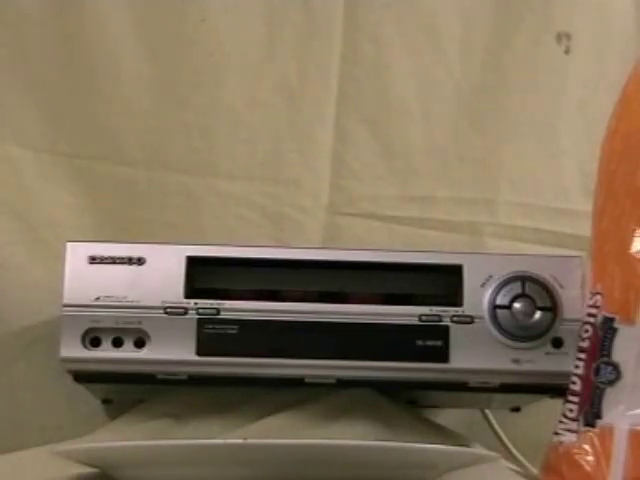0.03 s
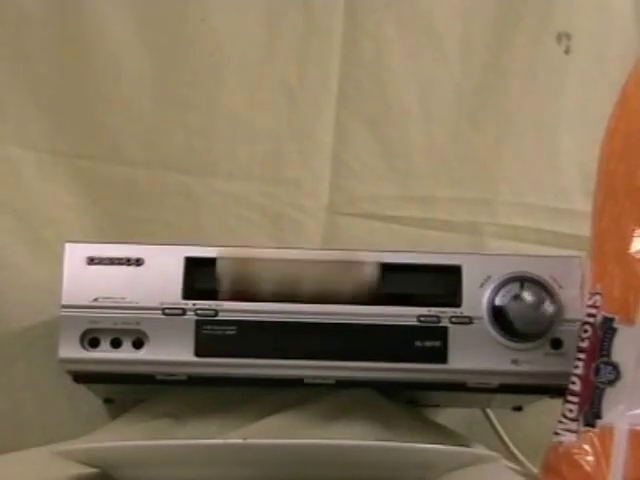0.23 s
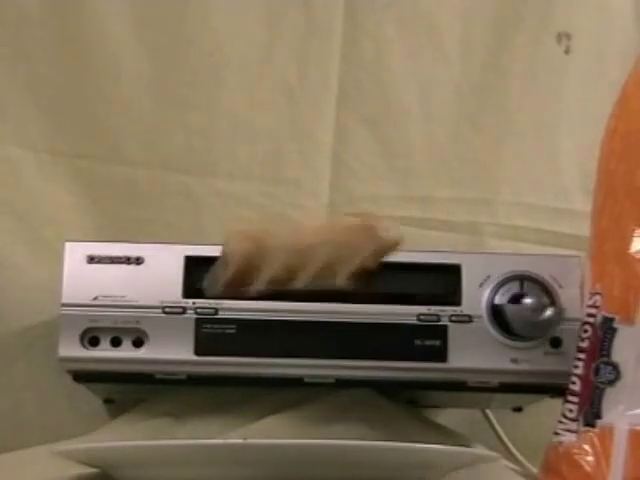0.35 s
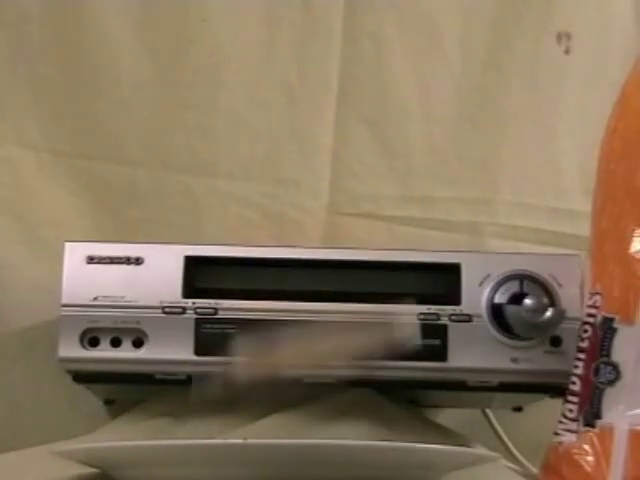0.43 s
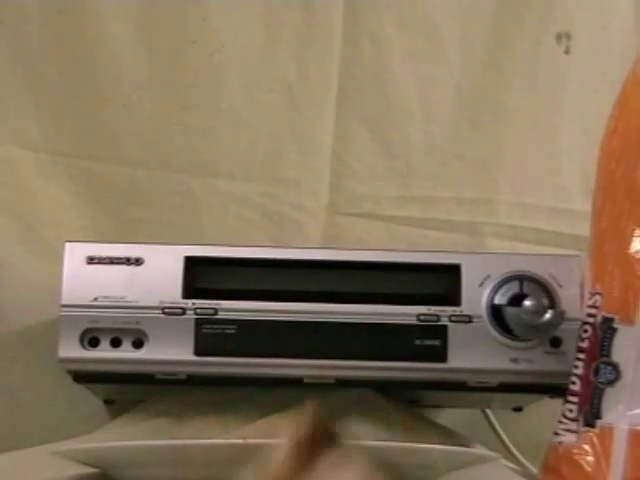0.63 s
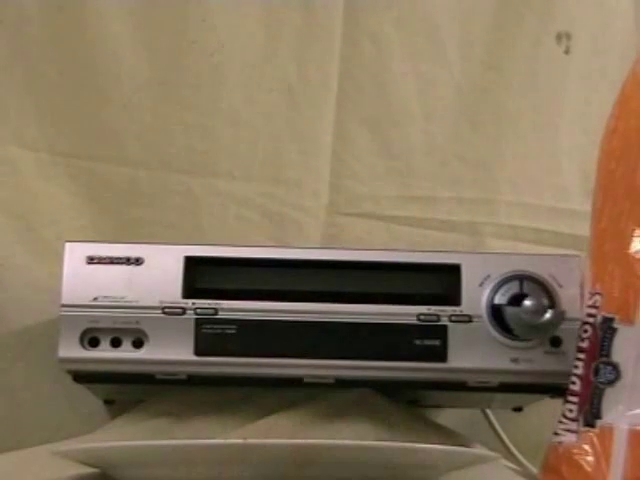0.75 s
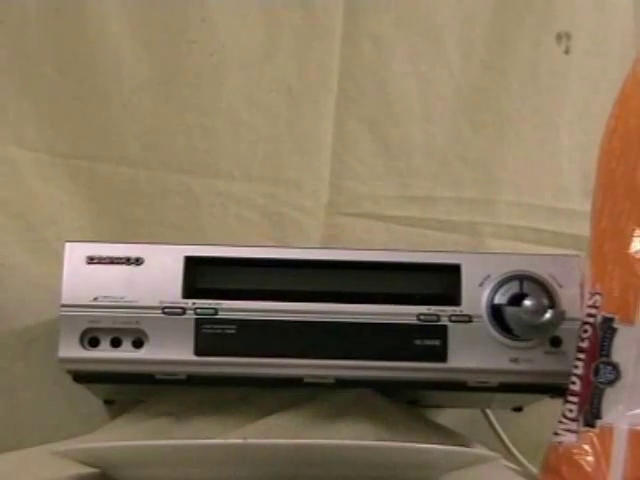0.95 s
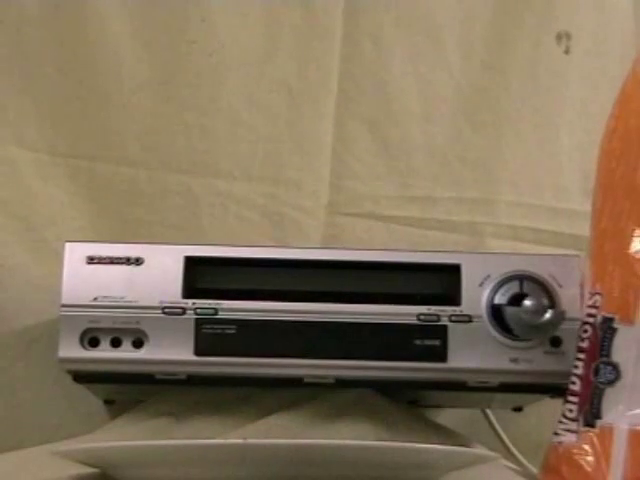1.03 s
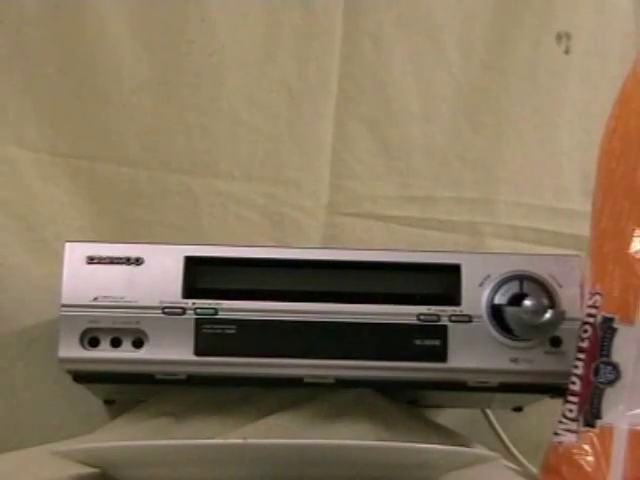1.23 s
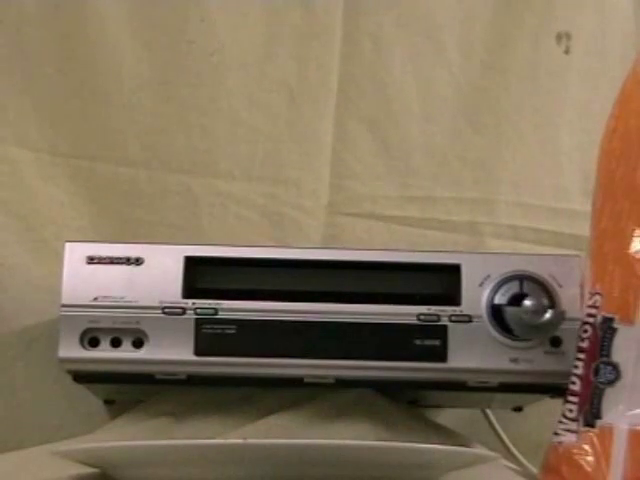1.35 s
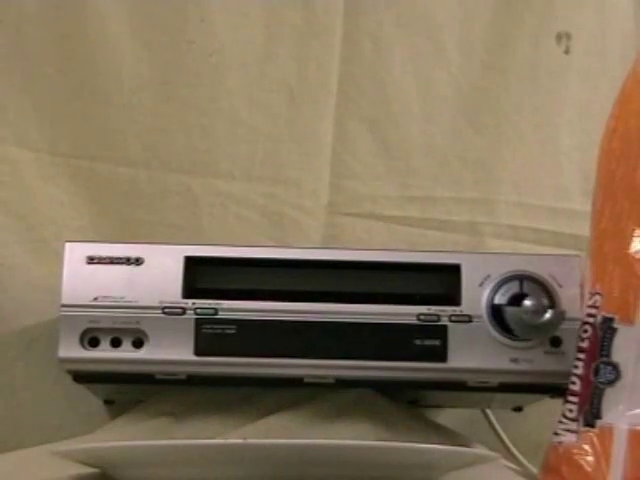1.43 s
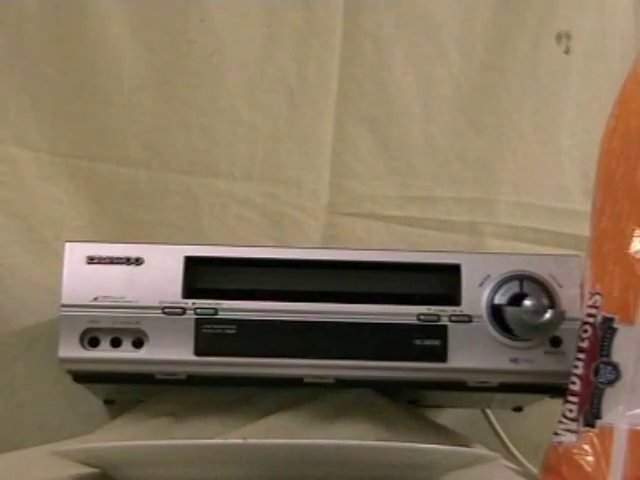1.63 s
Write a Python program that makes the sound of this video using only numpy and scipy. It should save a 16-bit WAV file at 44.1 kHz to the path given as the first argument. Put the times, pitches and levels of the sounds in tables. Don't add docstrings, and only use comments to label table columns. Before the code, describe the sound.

Toast ejects with a sharp mechanical clatter, hits sheet metal and lands on a ringing plate. A soft flop and late plastic clicks follow, heard close up in a small kitchen with low hum and hiss.

```python
import sys
import numpy as np
from scipy import signal
from scipy.fft import rfft, irfft
from scipy.io import wavfile

SR = 44100
rng = np.random.default_rng(int(sys.argv[2]) if len(sys.argv) > 2 else 0)


def magnitude_from_level(level_db):
    exponent = np.asarray(level_db, float) / 20
    return 10 ** exponent


def int16_out(signal):
    q = np.round(np.clip(np.atleast_2d(signal).T, -1, 1) * 32767)
    wavfile.write(sys.argv[1], SR, q.astype(np.int16))


N = 74970
TIME = np.arange(N) / SR
LEFT_RIGHT = np.array([[1], [-1]])


def unit(x):
    return x / np.sqrt(np.mean(x ** 2))


def band(x, hz, width):
    return signal.lfilter(*signal.iirpeak(hz, max(hz / width, .3), fs=SR), x)


def butter(x, order, hz, kind="low"):
    return signal.sosfilt(signal.butter(order, hz, kind, fs=SR, output="sos"), x)


def treble(x, hz):
    return signal.lfilter(*signal.butter(1, hz, "high", fs=SR), x)


def colour(x, points):
    hz, db = np.array(points).T
    bins = np.arange(N // 2 + 1) * SR / N + 1
    return unit(irfft(rfft(x) * magnitude_from_level(np.interp(np.log(bins), np.log(hz), db)), N))


def clicks(per_s, spread_db):
    chance, sign, size = rng.random((N, 3)).T
    return (chance < per_s / SR) * np.sign(sign - .5) * magnitude_from_level(-spread_db * np.log(size + .01))


def struck(hits, modes, damp=1, rock_db=0):
    out = np.zeros(N)
    sway = rng.random((16, 2))
    unevenness_db = rng.standard_normal((len(hits), 16))
    for (start, db, contact_ms), uneven in zip(hits, unevenness_db):
        for k, (hz, mode_db, t60) in enumerate(modes):
            decay_s = t60 * damp
            ringing = slice(int(start * SR) + 1, int((start + decay_s) * SR))
            t = TIME[ringing]
            age = t - start
            push = (-1) ** k / np.sqrt(1 + (hz * contact_ms * 0.0016) ** 2)
            rock_hz = 30 * (.5 + sway[k, 0])
            waver = rock_db * np.sin(2 * np.pi * (rock_hz * t + sway[k, 1]))
            level = magnitude_from_level(db + mode_db + uneven[k] + waver - 60 * age / decay_s)
            out[ringing] += level * push * np.sin(2 * np.pi * hz * age)
    return out


def snaps(rows):
    out = np.zeros(N)
    for start, db, hz, cycles in rows:
        age = np.maximum(TIME - start, 0)
        out += magnitude_from_level(db) * 1.48 * np.sin(2 * np.pi * hz * age) * np.exp(-1.3 * age * hz / cycles)
    return out


def tails(times, rows):
    out = np.zeros(N)
    for start, (db, t60, hz, width) in zip(times, rows):
        fade = magnitude_from_level(db - 60 * np.maximum(TIME - start, 0) / t60) * (TIME > start)
        out += fade * unit(band(clicks(9000, 1.3), hz, width))
    return out


# time in seconds, rumble of the case in dB, scrape of the rails in dB.
TRAVEL = [(0.205, -46, -44), (0.227, -25.5, -28), (0.232, -23.5, -17.5), (0.25, -17, -26.5),
          (0.271, -18, -8.5), (0.281, -15.5, -17.5), (0.34, -20, -22.5), (0.459, -29.5, -28.5),
          (0.545, -27.5, -51)]
# pitch in Hz, width in Hz, level in dB.
CASE = [(430, 90, 8), (793, 125, 8), (1091, 33, 7), (1430, 120, 5), (1793, 55, 1.5), (2180, 98, 2),
        (2500, 98, -14), (3300, 50, -15)]
# frequency in Hz, level in dB per Hz.
RAILS = [(880, -38), (1500, -8.5), (2660, -9.5), (3100, -13.5), (4530, -8), (4750, -12.5), (11500, -15.5),
         (15200, -21.5)]
# start in seconds, level in dB, pitch in Hz, length in cycles.
SLAMS = [(0.2288, -18, 3500, 4.5), (0.2518, -14, 557, 2.5), (0.255, -9, 580, 1.4), (0.2612, -6, 2300, 3.6),
         (0.2615, -3, 820, 0.95), (0.2625, -8, 3500, 4.5), (0.2675, -7, 1660, 2.2), (0.2682, -9.5, 935, 2),
         (0.2705, 2, 9800, 1.7), (0.2738, -7.5, 1430, 3.7), (0.2795, -11.5, 700, 1.2),
         (0.2912, -15, 790, 0.71), (0.3005, -10, 1490, 4), (0.3238, -10.5, 700, 1.2),
         (0.328, -18, 555, 1.35)]


def carriage():
    hits = clicks(6000, 2.5)
    case = sum((-1) ** k * magnitude_from_level(db) * band(hits, hz, 1.23 * width) for k, (hz, width, db) in enumerate(CASE))
    case = unit(case) + magnitude_from_level(-6.0) * unit(band(hits, 1220, 2300))
    rails = colour(clicks(8000, 3), [(500, -17.5)] + list(RAILS))
    s, case_db, rails_db = np.array(TRAVEL).T
    rumble = magnitude_from_level(np.interp(TIME, s, case_db, left=-120, right=-120))
    scrape = magnitude_from_level(np.interp(TIME, s, rails_db, left=-120, right=-120))
    return unit(case) * rumble + rails * scrape + snaps(SLAMS)


# start in seconds, level in dB, contact in ms.
SPRING_HITS = [
    (0.385, -36.5, 0.017),
    (0.46, -38, 0.022),
]
# pitch in Hz, level in dB, t60 in seconds.
SPRING = [(11600, -7, 0.26), (3980, -2, 0.17)]


def spring():
    return struck(SPRING_HITS, SPRING)


# start in seconds, level in dB, contact in ms.
COIL_HITS = [(0.385, -43, .01)]
# pitch in Hz, level in dB, t60 in seconds.
COIL = [(6713, 0, 3.0)]


def coil():
    return struck(COIL_HITS, COIL)


# start in seconds, level in dB, contact in ms.
LIP_HITS = [
    (0.4675, -11.5, 0.76),
    (0.4755, -7.5, 0.73),
    (0.4825, -13, 0.42),
    (0.489, -29, 0.28),
]
# pitch in Hz, level in dB, t60 in seconds.
LIP = [(500.4, -10.5, 0.19), (784, 4.5, 0.044), (1010, -17, 0.19), (1600, -20, 0.057), (2300, -31, 0.15),
       (2600, -12.5, 0.06), (2850, -36, 0.15)]


def lip():
    return struck(LIP_HITS, LIP, damp=0.96)


# start in seconds, level in dB, contact in ms.
PLATE_HITS = [
    (0.5395, -24.5, 0.071),
    (0.5435, -20, 0.21),
    (0.5515, -15, 0.097),
    (0.555, -17, 0.28),
    (0.5615, -23.5, 0.36),
    (0.9612, -51, 0.14),
]
PLATE_HZ = 1877, 2065, 2842, 2910, 3612, 3718, 4307, 4630, 5624, 5689, 6262
# level in dB, t60 in seconds.
PLATE = [(6.5, 0.15), (-4.5, 0.45), (-6.5, 0.27), (-4.5, 0.29), (-7.5, 0.38), (2, 0.058), (-3, 0.08),
         (-10.5, 0.26), (-13, 0.29), (-7.5, 0.14), (-25, .17)]
# start in seconds, level in dB, contact in ms.
GLAZE_HITS = [(0.5395, -33, .01), (0.546, -38, .01), (0.5515, -38, .01), (0.558, -39, .01),
              (0.568, -42, .01)]
GLAZE_HZ = 6720, 7000, 7360, 7907, 8317, 8543, 9204, 9894, 10592, 10936, 11640, 11890, 12100, 13690
# level in dB, t60 in seconds.
GLAZE = [(-2, 0.14), (-13, .15), (-11, 0.094), (-7, 0.45), (-14, 0.24), (-14, 0.15), (-2.5, 0.26),
         (-8, 0.27), (-1, 0.09), (-12, 0.12), (-7, 0.13), (-12, 0.14), (-4, 0.12), (-15, 0.2)]
# start in seconds, level in dB, contact in ms.
BOWL_HITS = [
    (0.5395, -26.5, .3),
    (0.558, -19.5, .4),
    (0.5625, -16.5, .4),
    (0.612, -25, 0.37),
]
# pitch in Hz, level in dB, t60 in seconds.
BOWL = [(652, 1, 0.18), (693, -1.5, .15)]


def plate():
    low = [(hz, *mode) for hz, mode in zip(PLATE_HZ, PLATE)]
    high = [(hz, *mode) for hz, mode in zip(GLAZE_HZ, GLAZE)]
    body = struck(PLATE_HITS, low, damp=0.85, rock_db=1.5)
    glaze = struck(GLAZE_HITS, high, damp=0.86, rock_db=4.5)
    return body + glaze + struck(BOWL_HITS, BOWL)


# start in seconds, level in dB, contact in ms.
RIM_HITS = [
    (0.5402, -20.5, 0.088),
    (0.5538, -22.5, 0.092),
]
# pitch in Hz, level in dB, t60 in seconds.
RIM = [
    (1321, 0, .48),
    (1325, 9, .06),
]


def rim():
    pan_db = -5
    return struck(RIM_HITS, RIM) * magnitude_from_level(pan_db * LEFT_RIGHT / 2)


# level in dB, t60 in seconds, centre in Hz, width in Hz.
LANDING = [(-14.5, 0.31, 790, 4600)]
GRIT_S = 0.5395, 0.5515, 0.5515
# level in dB, t60 in seconds, centre in Hz, width in Hz.
GRIT = [
    (-39, .3, 8000, 8000),
    (-23, .05, 2200, 900),
    (-37, .3, 3300, 1500),
]


def crumb():
    return butter(tails([0.5395], LANDING), 4, 2600) + tails(GRIT_S, GRIT)


def slide():
    centre_s, length_s = 0.773, 0.043
    swell = np.exp(-.5 * ((TIME - centre_s) / length_s) ** 2)
    return magnitude_from_level(-43) * swell * unit(band(clicks(8900, 1.2), 3500, 4500))


# start in seconds, level in dB, contact in ms.
FLOP_HITS = [
    (0.9612, -21, 0.29),
    (0.962, -12.5, 0.36),
    (0.968, -17.5, 0.74),
    (0.974, -25.5, 0.98),
    (0.984, -30, .4),
]
# pitch in Hz, level in dB, t60 in seconds.
FLOP = [(388, 1, 0.032), (636, 2.5, 0.05), (726, -9, 0.045), (823, 2.5, 0.047), (954, -23, 0.016),
        (1400, -17, 0.012), (1670, 1, 0.011), (3300, -4, 0.016), (4060, -7.5, 0.016)]
# start in seconds, level in dB, pitch in Hz, length in cycles.
SLAP = [
    (0.9612, -13, 7500, 3.0),
    (0.9619, -10, 800, 3.5),
    (0.962, -14, 1600, 4.5),
]
CRUNCH_S = 0.9612, 0.9625, 0.9625, 0.4675
# level in dB, t60 in seconds, centre in Hz, width in Hz.
CRUNCH = [
    (-19, 0.025, 8600, 2500),
    (-21.5, 0.1, 1260, 440),
    (-23, 0.12, 2600, 420),
    (-24.5, 0.24, 1950, 1100),
]


def flop():
    return struck(FLOP_HITS, FLOP) + snaps(SLAP) + tails(CRUNCH_S, CRUNCH)


# start in seconds, level in dB, pitch in Hz, length in cycles.
SNAPS = [(1.3543, 1, 3200, 1.6), (1.3544, -10, 10500, 1.5), (1.3575, -14, 3500, 3.0),
         (1.3607, -12, 3600, 5.0), (1.3637, -4, 2600, 1.6), (1.3637, -5, 5200, 2.2),
         (1.3702, -17, 2700, 3.0), (1.3706, -19, 5000, 4.0), (1.3849, -3, 4400, 1.5),
         (1.3849, -11, 11500, 1.5), (1.3852, 2, 1900, 1.0), (1.3935, -9, 2200, 1.0),
         (1.4105, -14, 2500, 1.5), (1.4138, -8, 3200, 1.4), (1.4139, -14, 5400, 2.0),
         (1.4712, -18, 2400, 2.5), (1.478, -25, 2600, 2.5), (1.5015, -10, 3700, 1.8),
         (1.5016, -17, 5600, 2.0), (1.508, -20, 3500, 2.0)]
RATTLES_S = 1.3515, 1.3545, 1.3825, 1.386, 1.412, 1.502, 1.3545, 1.386
# level in dB, t60 in seconds, centre in Hz, width in
# Hz.
RATTLES = [(-24, 0.048, 1500, 1800), (-20, 0.15, 3870, 720), (-16, 0.061, 4500, 2100),
           (-20, 0.19, 1300, 2100), (-24, 0.12, 4100, 990), (-30, 0.2, 2100, 2000),
           (-29, 0.089, 8800, 9000), (-21, 0.054, 5000, 2300)]


def plastic():
    return snaps(SNAPS) + tails(RATTLES_S, RATTLES)


# start in seconds, level in dB, pitch in Hz, length in cycles.
BOOM = [(0.43, -27, 172, 29), (0.2486, -55, 150, 2.7)]


def boom():
    return snaps(BOOM)


def room(x):
    t = np.arange(SR // 2) / SR
    noise = rng.standard_normal((2, len(t)))
    low = signal.lfilter(*signal.butter(1, 2000, fs=SR), noise)
    t60_s, treble_t60_s, gap_s = 0.29, 0.22, 0.0044
    tail = low * magnitude_from_level(-60 * t / t60_s) + (noise - low) * magnitude_from_level(-60 * t / treble_t60_s)
    tail = tail * (t > gap_s)
    tail = tail / np.sqrt(np.sum(tail[0] ** 2))
    mid, side = signal.fftconvolve(x[None], tail, axes=1)[:, :N]
    side = treble(side, 4370) * magnitude_from_level(-1.5) + magnitude_from_level(-9.0) * side
    return magnitude_from_level(-8) * (mid + side * LEFT_RIGHT)


# pitch in Hz, level in dB.
HUM = [(50, -57), (99, -45)]


def hum():
    return sum(magnitude_from_level(db) * np.sqrt(2) * np.sin(2 * np.pi * hz * TIME) for hz, db in HUM)


# frequency in Hz, level in dB per Hz.
AIR = [(18, -37), (30, -15), (69, -6), (229, 1.5), (396, -8.5), (487, -1.5), (585, -8.5), (4460, -20.5),
       (15200, -37)]
# pitch in Hz, width in Hz, level in dB.
DRONE = [(103.2, 29, -51.5), (155.7, 8.9, -43), (168, 15.6, -43.5), (197.4, 21, -38.5), (242.4, 29.5, -37),
         (274.3, 9.2, -48), (360, 120, -44.5), (476.6, 13.2, -43.5), (991, 60, -52.5)]


def background():
    mid = colour(rng.standard_normal(N), AIR)
    side = colour(rng.standard_normal(N), AIR)
    side = treble(side, 4370) * magnitude_from_level(-8) + magnitude_from_level(-12.0) * side
    drone = np.zeros(N)
    for hz, width, db in DRONE:
        drone += magnitude_from_level(db) * unit(band(band(rng.standard_normal(N), hz, width), hz, width))
    return magnitude_from_level(-36) * (mid + side * LEFT_RIGHT) + drone


def scene():
    china = plate() + coil()
    late = butter(crumb() + flop() + plastic() + slide(), 4, 13500)
    near = butter(carriage() + spring() + lip() + late, 3, 225, "high")
    pan_db = -1 * (np.abs(TIME - 1.1) < .2) * LEFT_RIGHT / 2
    shade = magnitude_from_level(-12.5) * np.roll(treble(near + china, 4000), 23)
    direct = near * magnitude_from_level(pan_db) + china + shade * LEFT_RIGHT
    reflected = room(near + magnitude_from_level(-3.5) * china)
    return direct + reflected + rim() + boom() + hum() + background()


def band_limit(x):
    return signal.sosfilt(signal.butter(12, 15340, fs=SR, output="sos"), x)


def record(dry):
    side = (dry[0] - dry[1]) / 2
    top = signal.sosfiltfilt(signal.butter(6, 13600, "high", fs=SR, output="sos"), side)
    mix = np.clip(dry - top * LEFT_RIGHT + .0075, -1, 1)
    return band_limit(mix)


dry = scene()
out = record(dry)
int16_out(out)
```